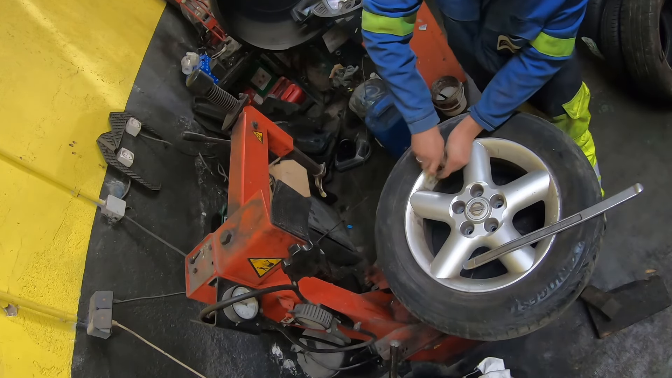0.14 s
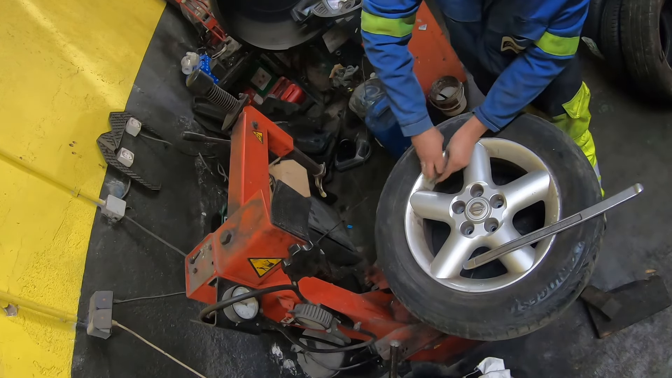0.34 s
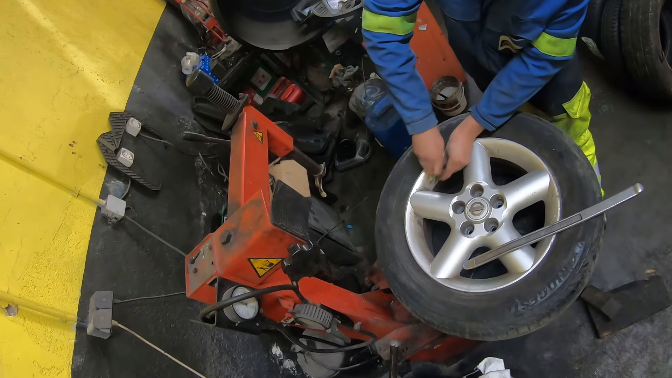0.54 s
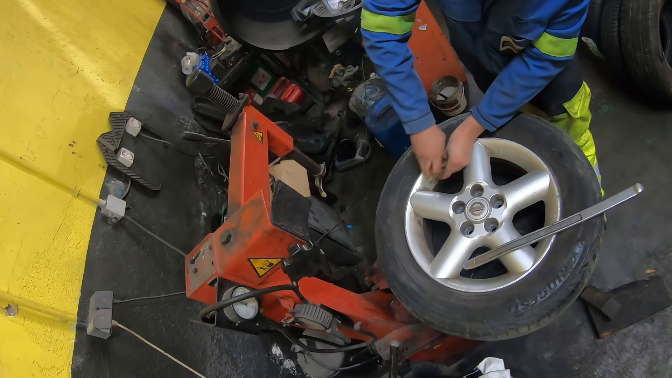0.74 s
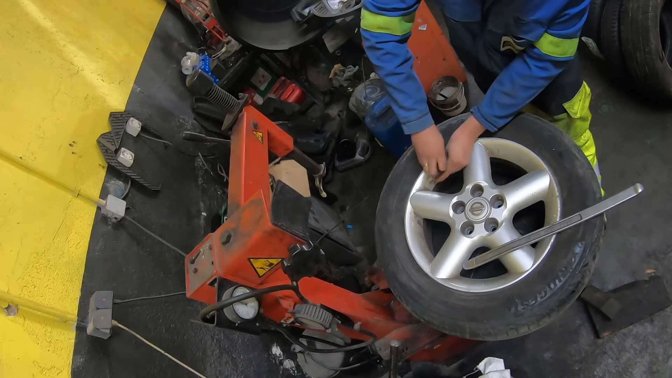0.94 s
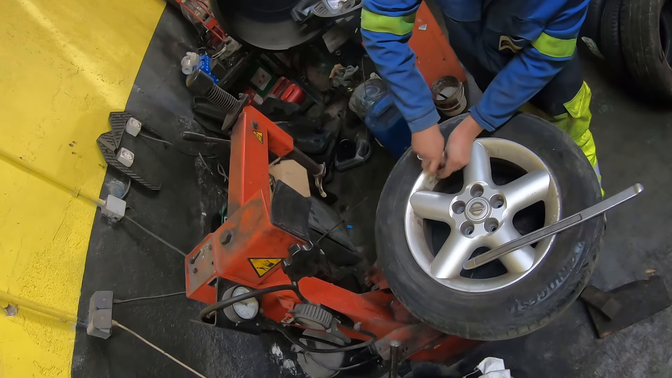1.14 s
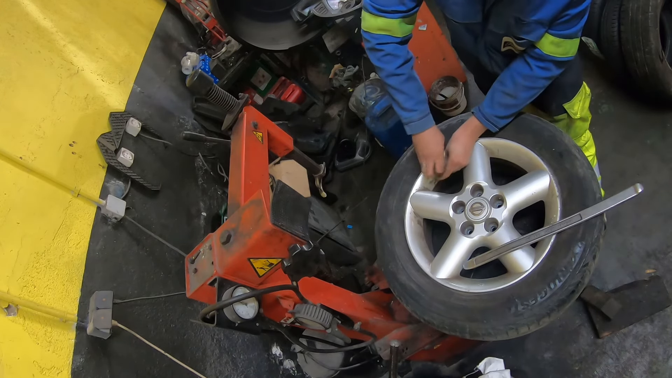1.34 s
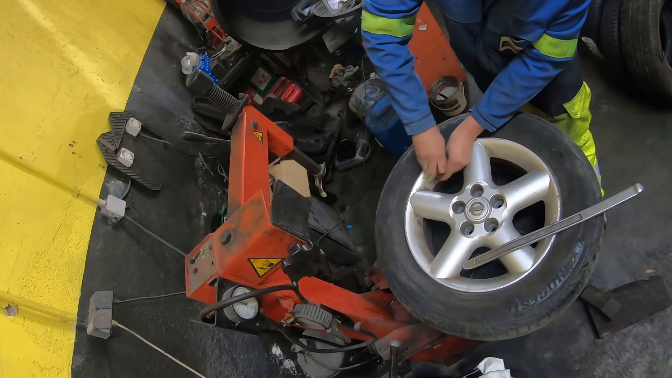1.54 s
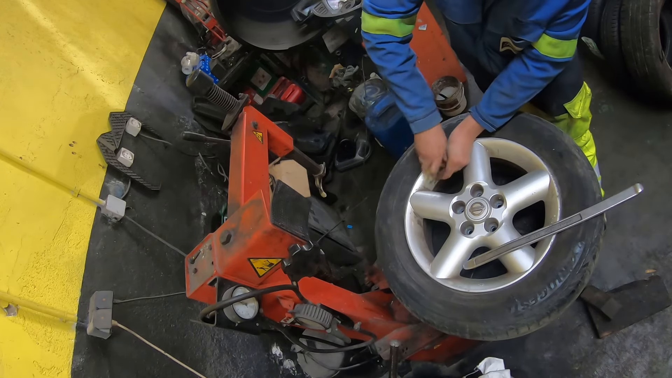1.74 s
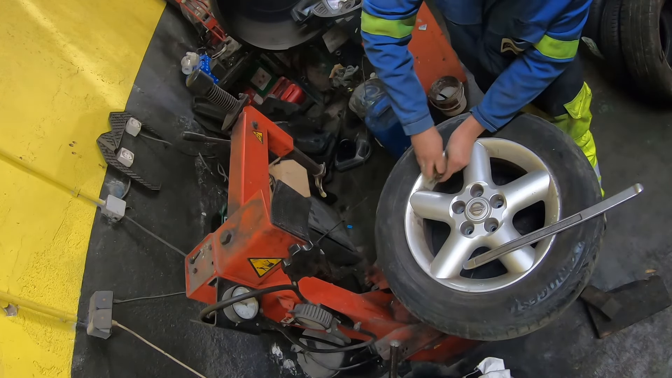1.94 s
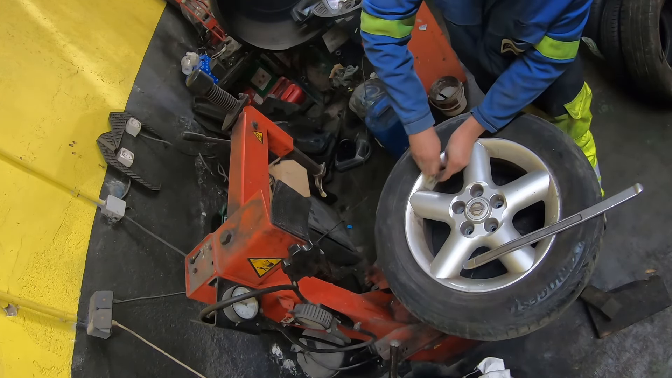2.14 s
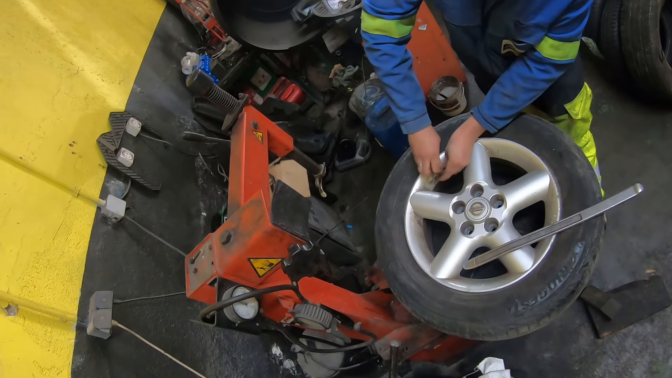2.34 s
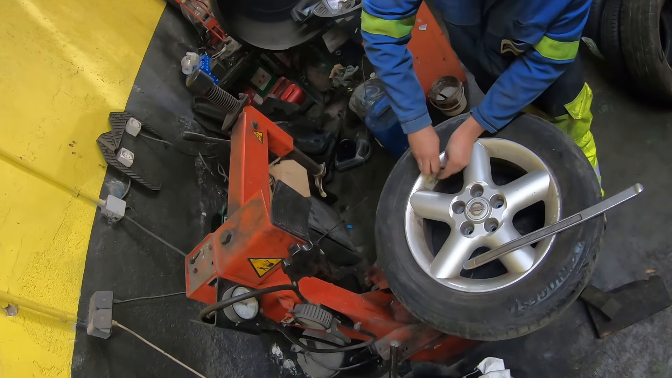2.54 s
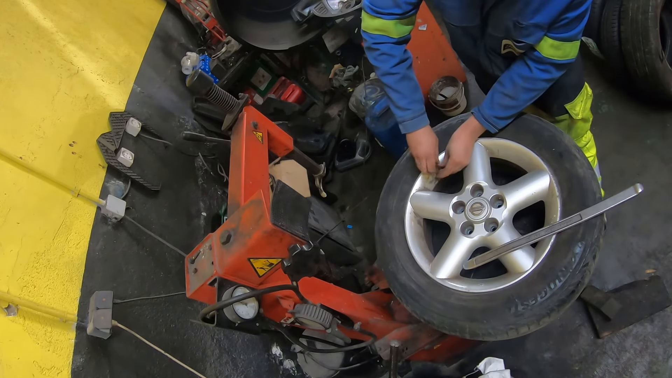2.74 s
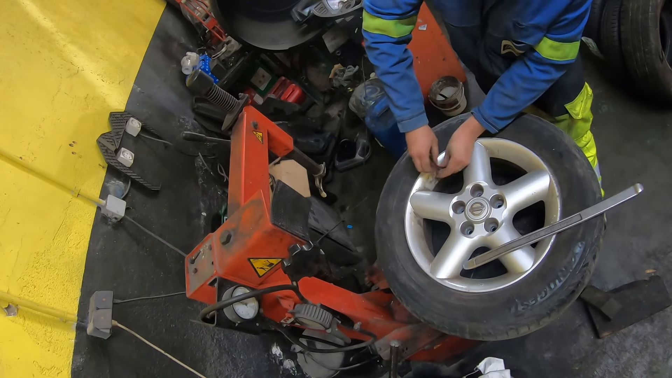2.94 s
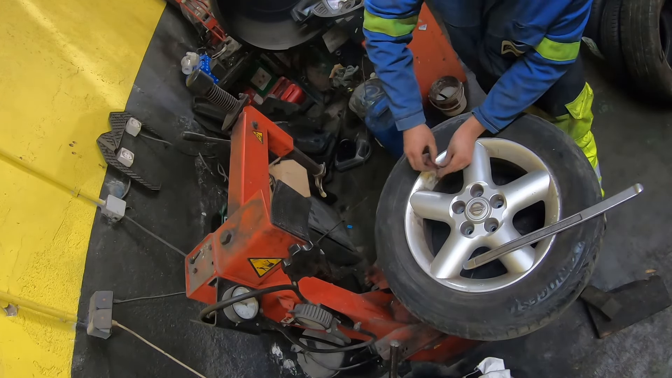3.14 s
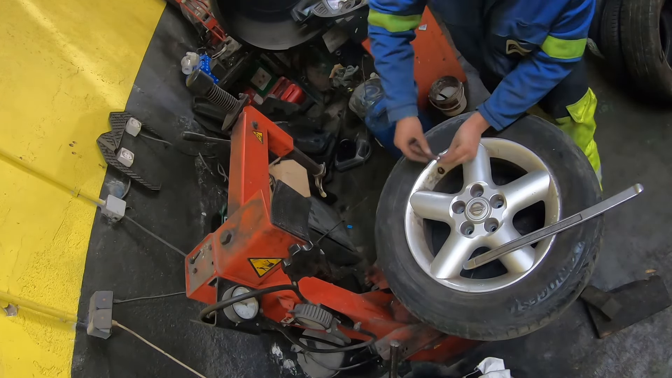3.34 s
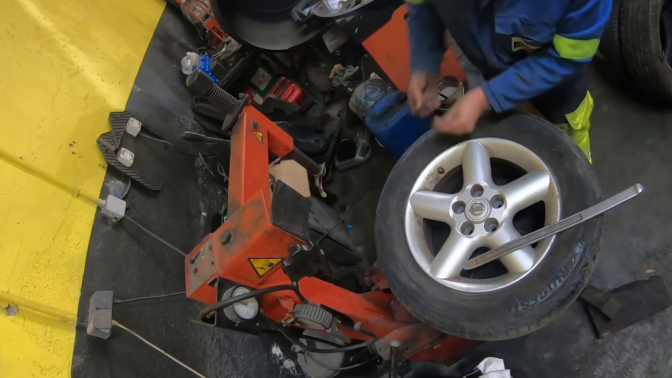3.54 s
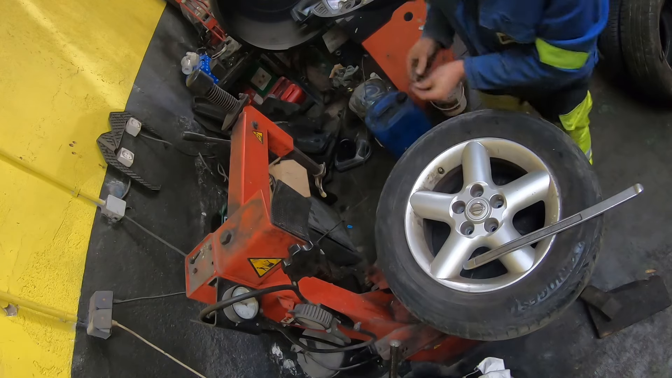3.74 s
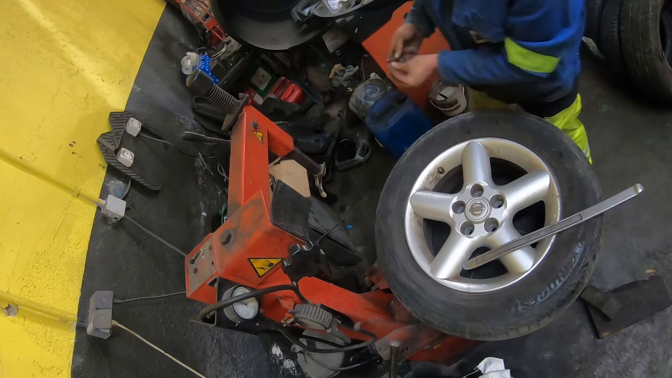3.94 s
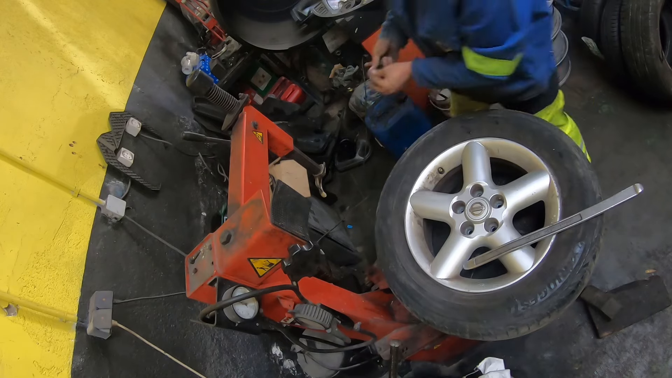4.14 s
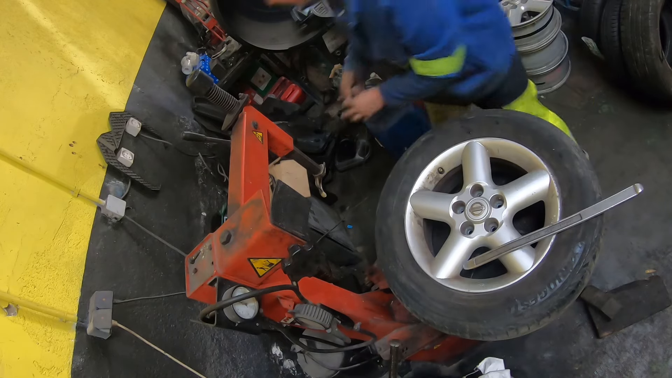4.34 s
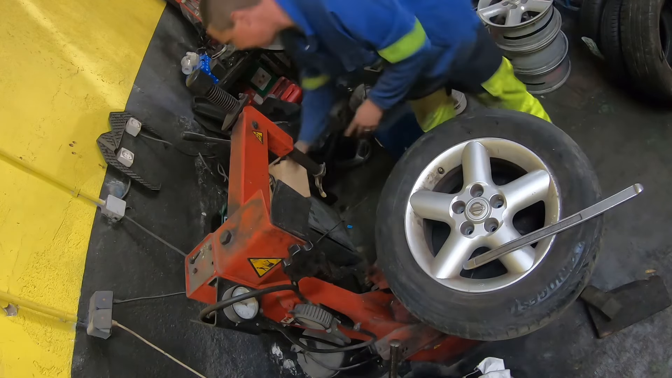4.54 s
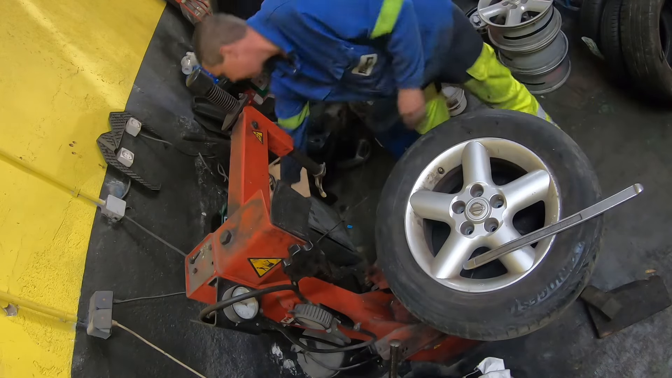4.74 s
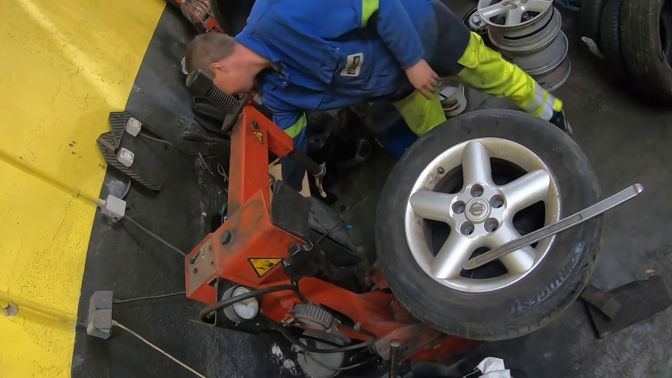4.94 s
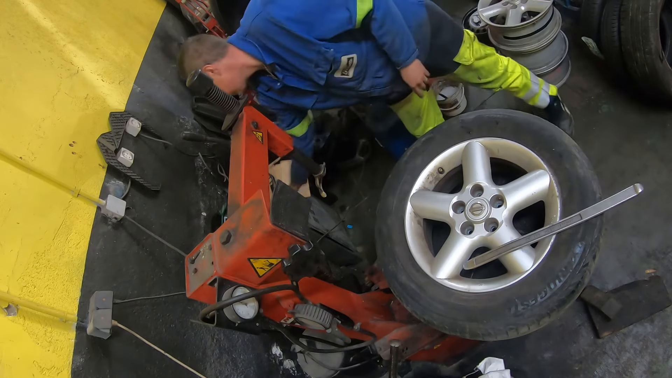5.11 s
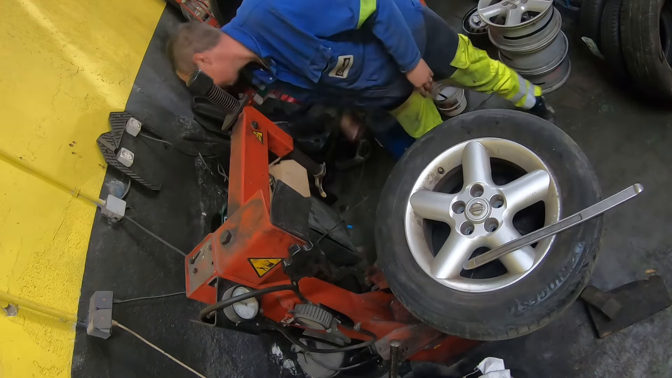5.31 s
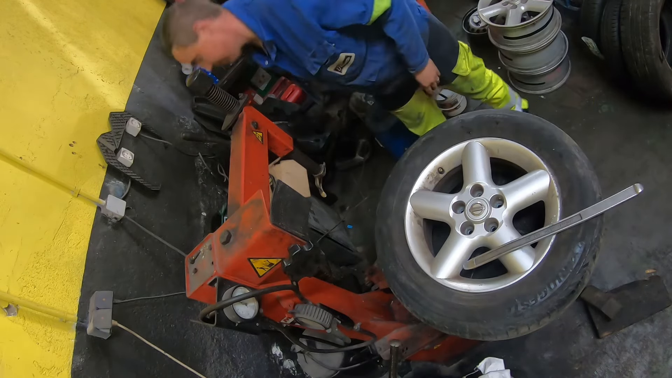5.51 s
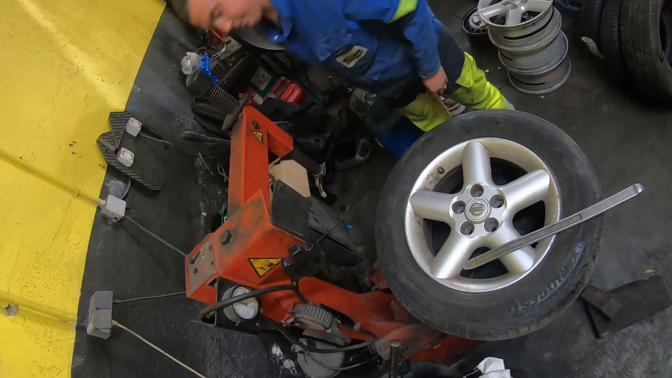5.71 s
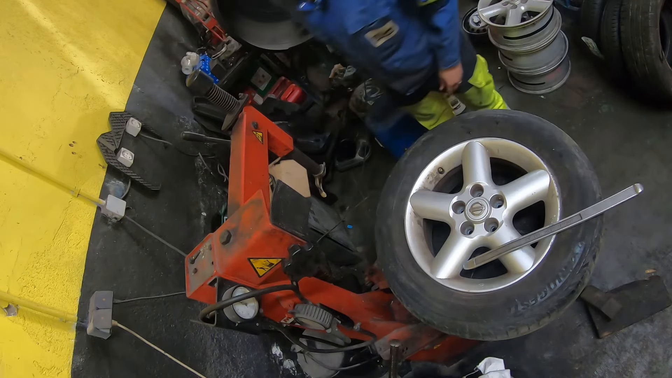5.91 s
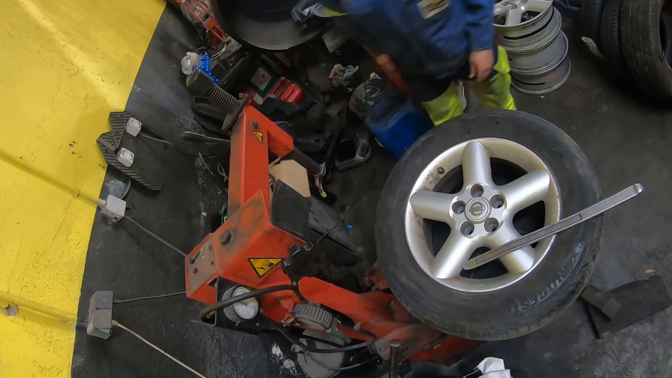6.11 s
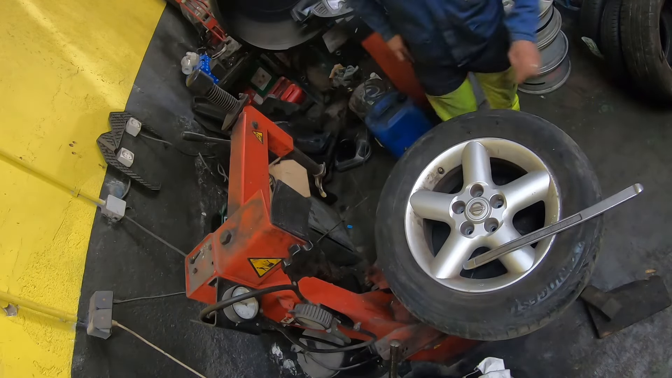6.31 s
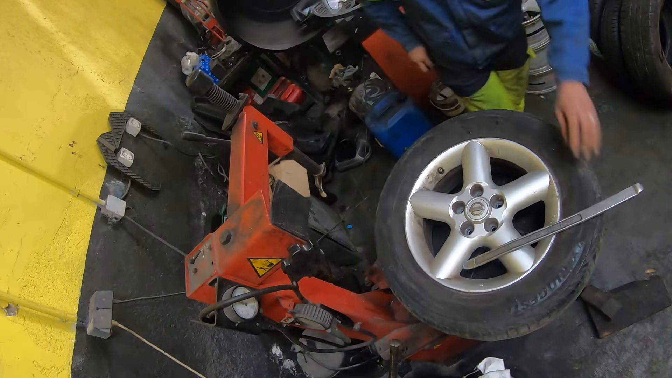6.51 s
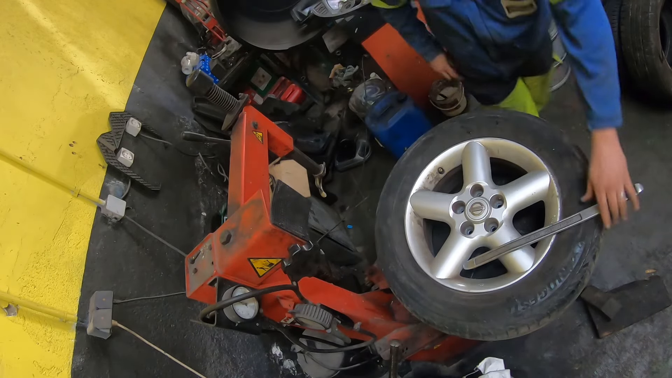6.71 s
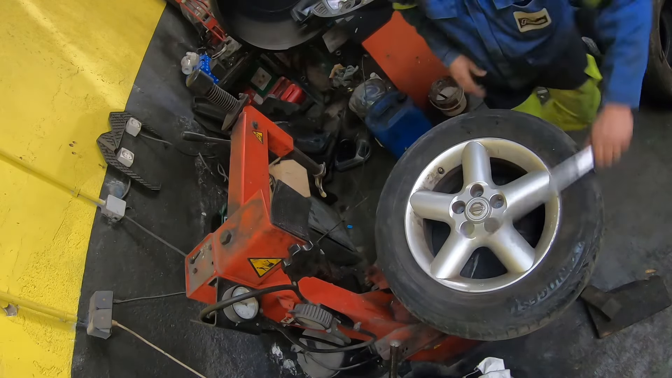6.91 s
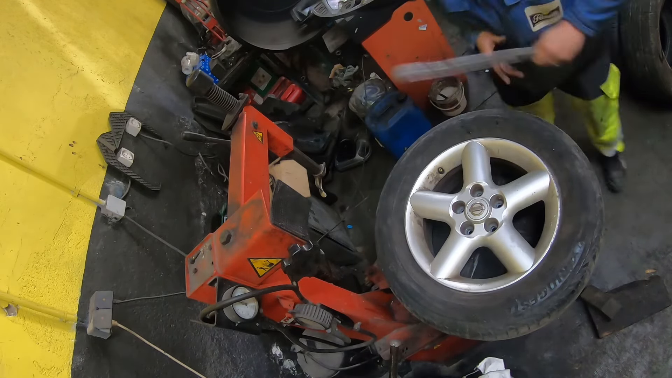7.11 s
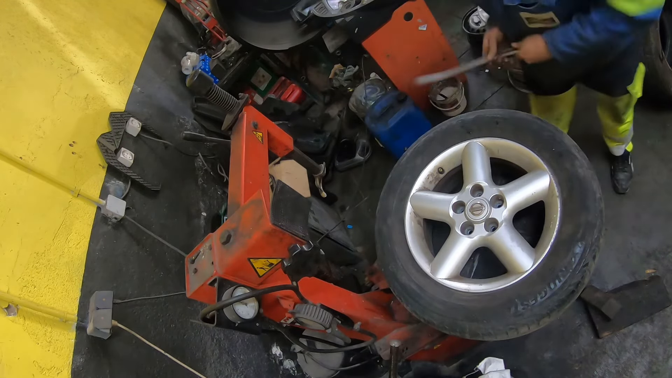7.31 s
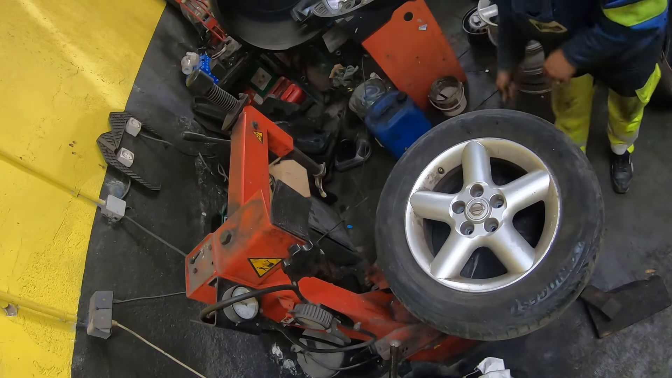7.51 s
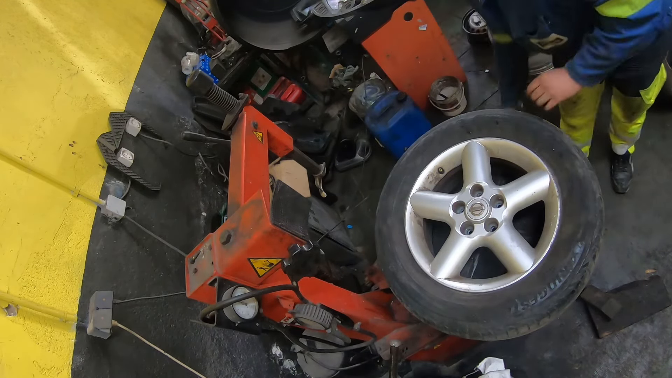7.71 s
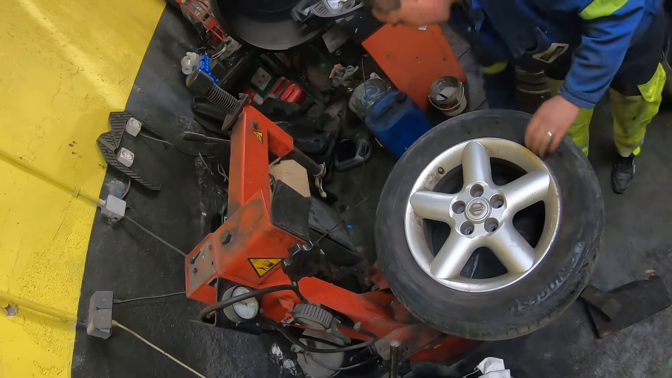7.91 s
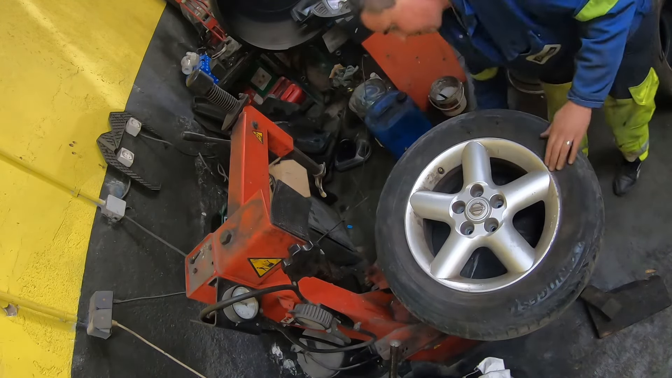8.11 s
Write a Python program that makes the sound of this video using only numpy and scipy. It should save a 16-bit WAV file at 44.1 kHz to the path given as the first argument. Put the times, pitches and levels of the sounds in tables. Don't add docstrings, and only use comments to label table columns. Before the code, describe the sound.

Over low workshop hum, a tyre valve leaks thin, irregular puffs of hiss. The air suddenly bursts out with a spitting, breathy whistle that slides down, then opens into a strong, steady bright hiss. Soft low bumps sound beneath it, then a sharp lever knock on the rim. At the very end the wheel is dragged, with loud hollow thuds and a rubbery rasp. Close single microphone, short hard room.

```python
import sys
import numpy as np
from scipy import signal
from scipy.fft import rfft, irfft, next_fast_len
from scipy.io import wavfile
from scipy.ndimage import uniform_filter1d

SR = 44100
rng = np.random.default_rng(int(sys.argv[2]) if len(sys.argv) > 2 else 0)


def bounce(signal):
    frames = np.transpose(np.atleast_2d(signal))
    limited = np.clip(frames, -1, 1)
    pcm = np.round(limited * 32767).astype(np.int16)
    wavfile.write(sys.argv[1], SR, pcm)


def voltage_ratio(level):
    return 10 ** (np.asarray(level, float) / 20)


N = 364266
TIME = np.arange(N) / SR
PADDED = next_fast_len(N + SR)
HZ = np.maximum(np.arange(PADDED // 2 + 1) * SR / PADDED, 1)

# time in seconds, level in dB.
SHOP_LEVEL = [(0.0, -45), (2.4, -45), (2.45, -52), (2.68, -50.5), (2.9, -53.5), (3.3, -55), (3.6, -53),
              (4.5, -52), (5.5, -50.5), (8.26, -50.5)]
# frequency in Hz, density in dB per Hz.
SHOP_COLOUR = [(53, 0), (90, -6), (171, 1.5), (782, -5), (948, -2.5), (1250, -5.5), (1390, -4),
               (1730, -5.5), (1880, -4), (2480, -5), (4930, -3), (9170, -9), (15000, -38)]
# frequency in Hz, width in Hz, level in dB re hum.
MOTORS = [(204, 10, -13), (953, 22, -8.5), (1038, 14, -12), (1389, 20, -4), (1600, 30, -14),
          (1806, 25, -13), (1899, 18, -4), (1918, 18, -4.5), (2040, 25, -15)]
# peak in seconds, level in dB re hum, rise in seconds, fall in seconds.
RUMBLE_SURGES = [(0.25, -0.5, 0.58, .4), (1.05, 3.5, 0.38, 0.44), (1.45, 3, 0.17, .15),
                 (1.82, 2.5, .12, 0.26), (2.13, 4, .15, 0.14), (2.42, 13, 0.069, 0.089),
                 (2.68, 12, 0.11, 0.18), (4.56, 3, 0.28, .6), (4.9, -3, .3, .3), (5.4, -1.5, .4, 0.47),
                 (5.95, 3, 0.45, .12), (6.5, 7, 0.13, 0.16), (7.15, 6, .2, .12), (7.6, 1, .4, 0.085),
                 (8.0, -2, .15, .1), (8.25, 4, .1, .1)]
# start in seconds,
# peak in dB, centre in Hz, width in Hz, T60 in seconds.
KNOCKS = [(2.419, -29.5, 150, 130, .3), (2.66, -37, 140, 130, .35), (4.866, -31, 94, 70, .3),
          (4.9, -35, 136, 60, 0.4), (6.829, -18.5, 500, 600, 0.027), (6.828, -19, 2400, 900, 0.022),
          (6.83, -27, 1710, 50, 0.03), (6.841, -21, 800, 700, 0.043), (6.843, -26, 1715, 50, .02),
          (6.86, -36, 130, 60, 0.56), (8.054, -24, 330, 60, 0.34), (8.067, -25, 1310, 200, 0.061),
          (8.098, -16, 390, 200, 0.36), (8.101, -26, 1500, 2460, .1), (8.11, -13, 2710, 60, 0.19),
          (8.144, -6, 300, 300, 0.052), (8.206, -10, 650, 500, 0.045), (8.219, -3.5, 420, 300, 0.044),
          (8.237, -11, 300, 300, 0.059)]
# peak in seconds, level in dB, rise in seconds, fall in seconds.
DRAG_PULLS = [
    (8.06, -41, 0.014, .03),
    (8.105, -14, 0.0045, .3),
    (8.212, -9, 0.032, 0.071),
    (8.25, -16, .03, .1),
]
# frequency in Hz, width in Hz, level in dB.
WHEEL_RINGS = [(163, 59, -8), (280, 73, -9), (347, 27, -3.5), (556, 130, -7.5), (763, 110, -5.5),
               (1090, 400, -10.5)]
# peak in seconds, level in dB, rise in seconds, fall in seconds.
PUFFS = [(0.085, -35.5, 0.082, 0.13), (0.31, -36, 0.068, 0.047), (0.52, -31.5, 0.082, .08),
         (0.7, -38, .06, 0.073), (0.85, -33, 0.095, 0.35), (1.315, -35.5, .03, 0.043),
         (1.42, -29.5, 0.014, 0.14), (1.51, -30, 0.1, 0.052), (1.94, -38, 0.044, .06),
         (2.03, -40, .03, .06), (2.11, -33, .04, .08), (2.185, -31, 0.082, 0.061),
         (2.315, -24.5, 0.03, 0.11), (2.36, -24.5, .06, 0.095), (2.4, -29, .06, .015)]
# time in seconds, level in dB.
LEAK_BEHIND = [(2.41, -32), (2.449, -28), (2.48, -35), (2.575, -27.5), (2.639, -25.5), (2.68, -26.5),
               (2.995, -24.5), (3.3, -38), (3.45, -50)]
# frequency in Hz, density in dB per Hz.
LEAK_COLOUR = [(900, -9), (1600, -7), (2800, -2), (3850, -4.5), (4250, -7), (4600, -4), (6500, -4.5),
               (7800, -0.5), (9400, -6), (10800, -12), (12000, -17.5), (15600, -29)]
# frequency in Hz, width in Hz, lift in dB.
LEAK_RINGS = [(4170, 120, 7), (4500, 200, -3), (4950, 350, 6), (5450, 250, -3), (5960, 300, 7),
              (6700, 400, -3), (7350, 500, 3), (8150, 400, -4), (9200, 400, 3), (9850, 250, -4),
              (10350, 400, 3)]
# time in seconds, centre in Hz, level in dB.
WHISTLE = [(2.395, 6030, -23), (2.435, 5700, -20), (2.5, 5870, -23), (2.62, 5950, -22.5),
           (2.665, 5320, -13.5), (2.744, 5170, -19.5), (2.85, 5110, -22.5), (3.034, 4990, -28.5),
           (3.13, 5100, -48)]
# centre in seconds, lift in dB, length in seconds.
SPITS = [(2.412, 12, .012), (2.425, -8, .01), (2.439, 8, .018), (2.553, 5, .025), (2.676, 4.5, 0.034),
         (2.7, 3, 0.027), (2.728, -4, 0.025), (2.776, 5, 0.015), (2.792, 4, 0.013)]
# time in seconds, centre in Hz, level in dB.
CUPPED = [(2.72, 4063, -50), (2.79, 3190, -28.5), (2.9, 2700, -38), (3.03, 4126, -32), (3.1, 2993, -36),
          (3.2, 1710, -39), (3.27, 1490, -43), (3.34, 1166, -35), (3.5, 900, -51)]
# time in seconds, level in dB.
JET_FLOW = [(2.7, -50), (2.9, -46), (3.05, -29), (3.25, -28), (3.36, -29), (3.5, -29.5), (4.3, -28),
            (6.0, -28), (6.9, -27.5), (8.09, -29), (8.18, -32), (8.26, -37)]
# frequency in Hz, density in dB per Hz.
JET_COLOUR = [(200, -35), (350, -30), (720, -21.5), (950, -14), (1900, -13.5), (2600, -7.5), (3700, -6.5),
              (5000, -5), (6500, -3.5), (8100, -1.5), (9400, -1), (10900, -8.5), (11400, -17), (13700, -18),
              (15600, -26.5)]
# frequency in Hz, width in Hz, lift in dB.
JET_RINGS = [(2720, 200, 2.5), (3190, 220, 3), (3750, 400, -2), (4330, 200, 2), (5250, 220, 3),
             (5700, 180, 3.5), (6850, 150, 2), (7330, 550, 4), (8100, 250, -2), (8880, 340, 6.5),
             (9830, 250, -6), (10300, 400, 1.5), (14250, 300, -4)]
# time in seconds, share turned from 0 to 1, arm closeness from 0 to 1.
TURNED = [(2.9, 0.8, 0.05), (3.15, 0.8, 0.03), (3.22, 0.9, 0.86), (3.31, 0.5, 1), (3.36, 0.2, 0.8),
          (3.41, 0.16, 0), (6.1, 0.1, 0.03), (6.8, 0.6, 0), (7.5, 0.8, 0.2), (7.85, 1, 0.5),
          (8.09, 0.9, 0.6), (8.18, 0.7, 0.6)]
# level in dB re flow, one each for core, low roar, rim-well ring and stem ring.
PART_DB = [-0.73, -4.5, -4, 2.5]
TURNED_GAIN_DB = [-1.35, -0.7, 4.5, -2.5]
ARM_GAIN_DB = [4, 1, -1.3, 0.7]
# start in seconds, drop in dB, recovery in seconds.
GAIN_DROPS = [
    (2.409, 7, 0.2),
    (2.44, -2, .1),
    (2.655, 6, 0.16),
    (2.715, 0.5, 0.12),
    (8.107, 5.5, 0.55),
    (8.202, 3.5, .5),
]
# centre in seconds, low edge in Hz, high edge in Hz, level in dB.
SIDE_FLECKS = [(0.848, 5684, 6890, -38), (1.986, 5684, 6890, -46), (3.566, 13200, 15300, -47),
               (3.799, 10938, 13092, -46), (5.125, 11025, 12300, -48.8), (5.398, 6360, 7579, -32),
               (5.402, 13006, 14470, -49.9), (5.819, 12403, 13867, -48.0), (5.958, 12316, 13781, -50),
               (5.982, 4220, 5167, -37), (7.466, 7700, 9043, -28), (7.539, 6400, 7579, -30),
               (7.7, 9646, 11541, -38)]


def rms_one(x):
    return x / np.sqrt(np.mean(x ** 2) + 1e-20)


def in_time(rows):
    s, *columns = np.transpose(rows)
    return [np.interp(TIME, s, column) for column in columns]


def between(rows, fade_s):
    inside_s = np.minimum(TIME - rows[0][0], rows[-1][0] + fade_s - TIME)
    return np.clip(inside_s / fade_s, 0, 1)


def swells(rows):
    power = np.zeros(N)
    for peak_s, level_db, rise_s, fall_s in rows:
        away = np.maximum((peak_s - TIME) / rise_s, (TIME - peak_s) / fall_s)
        power += voltage_ratio(level_db - 12 * away) ** 2
    return np.sqrt(power)


def drift(rate_hz):
    r = np.exp(-80 * np.pi * rate_hz / SR)
    slow = signal.lfilter([1], [1, -2 * r, r * r], rng.standard_normal(N // 40 + 2002))[2000:]
    return np.interp(np.arange(N) / 40, np.arange(len(slow)), rms_one(slow))


def coloured(points, rings=()):
    hz, level_db = np.transpose(points)
    gain_db = np.interp(np.log(HZ), np.log(hz), level_db, left=-60)
    for ring_hz, width_hz, lift_db in rings:
        gain_db += lift_db / (1 + (2 * (HZ - ring_hz) / width_hz) ** 2)
    return irfft(rfft(rng.standard_normal(PADDED)) * voltage_ratio(gain_db), PADDED)[:N]


def band(x, low_hz, high_hz):
    return signal.sosfilt(signal.butter(2, [low_hz, high_hz], "band", fs=SR, output="sos"), x)


def resonance(x, hz, width_hz):
    r = np.exp(-np.pi * width_hz / SR)
    zeros = np.array([1, 0, -1]) * (1 - r * r) / 2
    return signal.lfilter(zeros, [1, -2 * r * np.cos(2 * np.pi * hz / SR), r * r], x)


def gliding(rows, narrow_hz, wide_hz, wide_share):
    centre_hz, level_db = in_time(rows)
    noise = rng.standard_normal((2, N))
    narrow = signal.sosfilt(signal.butter(2, narrow_hz, fs=SR, output="sos"), noise)
    wide = signal.sosfilt(signal.butter(2, wide_hz, fs=SR, output="sos"), noise)
    base = np.sqrt(1 - wide_share) * rms_one(narrow) + np.sqrt(wide_share) * rms_one(wide)
    phase = 2 * np.pi * np.cumsum(centre_hz) / SR
    carried = base[0] * np.cos(phase) + base[1] * np.sin(phase)
    return carried * voltage_ratio(level_db) * between(rows, 0.01)


def room(x, wet_db):
    t60_s, first_echo_s = 0.076, 0.00456
    after_s = np.arange(SR // 2) / SR
    echoes = rng.standard_normal(len(after_s)) * voltage_ratio(-60 * after_s / t60_s) * (after_s > first_echo_s)
    echoes = rfft(echoes / np.sqrt(np.sum(echoes ** 2)), PADDED)
    return irfft(rfft(x, PADDED) * (1 + voltage_ratio(wet_db) * echoes), PADDED)[:N]


def motor(hz, width_hz):
    phase = 2 * np.pi * np.cumsum(hz + 0.3 * width_hz * drift(12)) / SR
    tone = voltage_ratio(2.5 * drift(9)) * np.sin(phase)
    skirt = resonance(resonance(rng.standard_normal(N), hz, width_hz), hz, width_hz)
    return rms_one(tone + 0.45 * rms_one(skirt))


def shop():
    fan_hz, fan_db, rumble_rest_db = 168.7, -2.5, -14
    hum_db, = in_time(SHOP_LEVEL)
    hall = coloured(SHOP_COLOUR)
    hall = hall / np.std(band(hall, 200, 600)) * voltage_ratio(0.5 * drift(8.1))
    tones = sum(voltage_ratio(level_db) * motor(hz, width_hz) for hz, width_hz, level_db in MOTORS)
    fan_phase = 2 * np.pi * np.cumsum(fan_hz + 2.5 * drift(5)) / SR
    fan = voltage_ratio(fan_db + 2.2 * drift(4.5)) * np.sin(fan_phase)
    rumble = rms_one(band(band(rng.standard_normal(N), 42, 75), 30, 100)) * voltage_ratio(1.5 * drift(8))
    rumble *= np.hypot(voltage_ratio(rumble_rest_db), swells(RUMBLE_SURGES))
    return voltage_ratio(hum_db) * (hall + tones + fan + rumble)


def knocks():
    out = np.zeros(N)
    after_s = np.arange(SR // 3) / SR
    for start_s, peak_db, hz, width_hz, t60_s in KNOCKS:
        start = round(start_s * SR)
        puff = rng.standard_normal(len(after_s)) * voltage_ratio(-60 * after_s / t60_s)
        puff[0] += 6.0
        rung = band(resonance(puff, hz, width_hz), 40, 3500)
        out[start:start + len(after_s)] += (voltage_ratio(peak_db) * rung / np.abs(rung).max())[:N - start]
    return out


def drag():
    rasp_db, rasp_fades_s, fade_db_per_s = -5.5, 8.19, 770
    slips = rng.standard_normal(N) * voltage_ratio(1.1 * drift(51))
    body = np.zeros(N)
    for k, (hz, width_hz, level_db) in enumerate(WHEEL_RINGS):
        body += (-1) ** k * voltage_ratio(level_db) * resonance(slips, hz, width_hz) / np.sqrt(width_hz)
    rasp = rms_one(band(band(slips, 1100, 2900), 490, 5300))
    rasp *= voltage_ratio(rasp_db - fade_db_per_s * np.maximum(TIME - rasp_fades_s, 0))
    return swells(DRAG_PULLS) * (rms_one(body) + rasp)


def leak():
    seep_db, core_loose_s, core_free_s = -47, 2.05, 2.3
    behind_db, = in_time(LEAK_BEHIND)
    seep = voltage_ratio(seep_db) * (TIME < LEAK_BEHIND[0][0])
    behind = voltage_ratio(behind_db) * between(LEAK_BEHIND, 0.027)
    flow = np.sqrt(seep ** 2 + swells(PUFFS) ** 2 + behind ** 2)
    low_db = np.interp(TIME, [core_loose_s - 0.05, core_loose_s + 0.05], [-17, -11])
    top_db = np.interp(TIME, [core_free_s - 0.03, core_free_s + 0.02], [-7.5, 0])
    low, body, top = (rms_one(band(coloured(LEAK_COLOUR, LEAK_RINGS), *edges_hz))
                      for edges_hz in [(1200, 3900), (3900, 6800), (6800, 17000)])
    return (voltage_ratio(low_db) * low + body + voltage_ratio(top_db) * top) * flow * voltage_ratio(1.2 * drift(30))


def whistle():
    spit_db = sum(lift_db * np.exp(-(2 * (TIME - s) / length_s) ** 4) for s, lift_db, length_s in SPITS)
    gap = gliding(WHISTLE, narrow_hz=160, wide_hz=450, wide_share=0.79)
    rush = gliding(CUPPED, narrow_hz=300, wide_hz=800, wide_share=0.8)
    return gap * voltage_ratio(spit_db - 1 + 1.5 * drift(40)) + rush


def jet():
    flow_db, = in_time(JET_FLOW)
    turned, arm = in_time(TURNED)
    flow_db = flow_db + 0.36 * drift(8.7)
    edges_hz = [(3600, 6700), (250, 3600), (6700, 8100), (8100, 17000)]
    hiss = np.zeros(N)
    for edge_hz, part_db, turned_db, arm_db in zip(edges_hz, PART_DB, TURNED_GAIN_DB, ARM_GAIN_DB):
        part = rms_one(band(coloured(JET_COLOUR, JET_RINGS), *edge_hz))
        hiss += part * voltage_ratio(flow_db + part_db + turned_db * turned + arm_db * arm + 0.49 * drift(25))
    return hiss * np.clip((TIME - JET_FLOW[0][0]) / 0.062, 0, 1)


def scene():
    near = room(jet() + whistle() + knocks() + drag(), wet_db=-11.5)
    mono = near + room(leak(), wet_db=-4.5) + shop()
    return np.array([mono, mono])


def side_flecks():
    out, window = np.zeros(N), signal.windows.tukey(1500, 0.7)
    hz = np.arange(len(window) // 2 + 1) * SR / len(window)
    for centre_s, low_hz, high_hz, level_db in SIDE_FLECKS:
        start = round(centre_s * SR) - len(window) // 2
        noise = irfft(rfft(rng.standard_normal(len(window))) * (hz > low_hz) * (hz < high_hz))
        out[start:start + len(window)] += voltage_ratio(level_db) * rms_one(noise) * window
    return out * [[1], [-1]]


def roll_off(x):
    return signal.sosfilt(signal.butter(12, 15710, fs=SR, output="sos"), x)


def record(dry):
    gain_db = np.zeros(N)
    for start_s, drop_db, recovery_s in GAIN_DROPS:
        after_s = np.maximum(TIME - start_s, 0)
        gain_db -= drop_db * (TIME > start_s) * np.exp(-after_s / recovery_s)
    held = dry * voltage_ratio(uniform_filter1d(gain_db, size=300))
    top = 0.5
    limited = top * np.sqrt(np.tanh((np.abs(held) / top) ** 2)) * np.sign(held)
    return roll_off(limited + side_flecks())


dry = scene()
out = record(dry)
bounce(out)
```